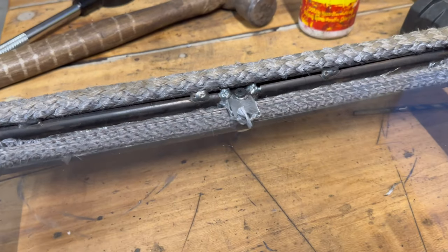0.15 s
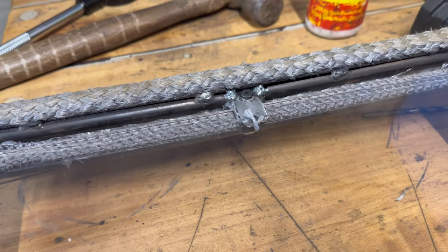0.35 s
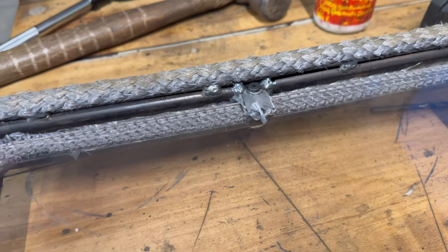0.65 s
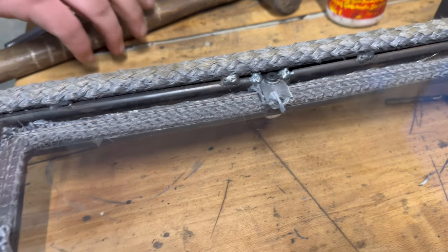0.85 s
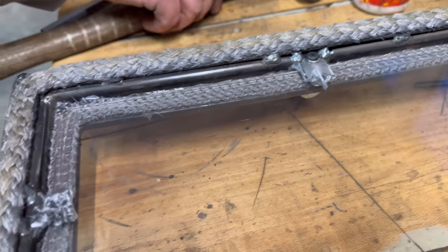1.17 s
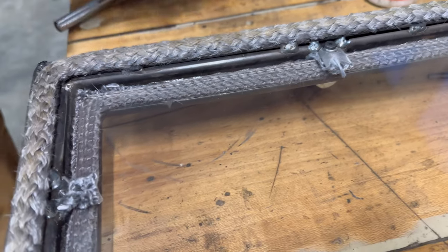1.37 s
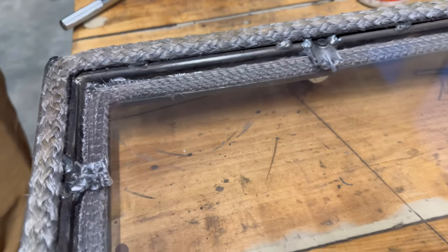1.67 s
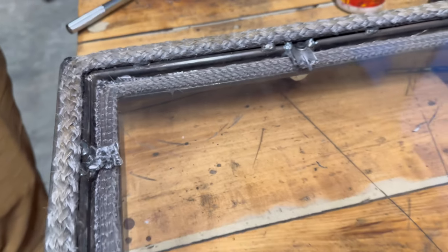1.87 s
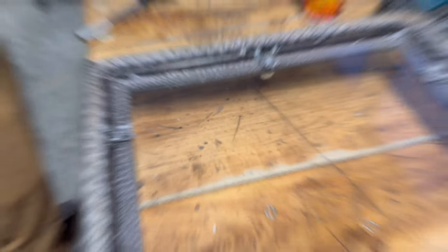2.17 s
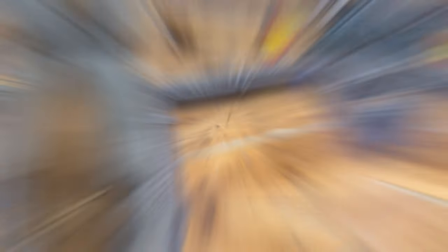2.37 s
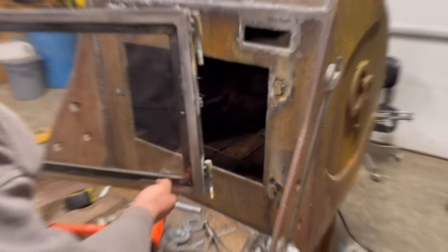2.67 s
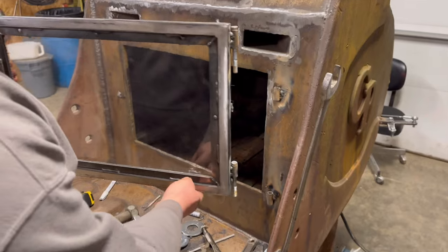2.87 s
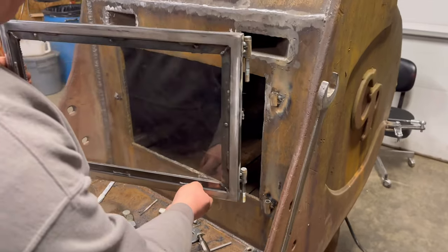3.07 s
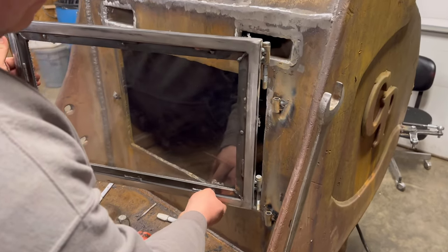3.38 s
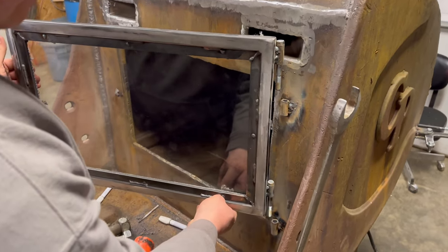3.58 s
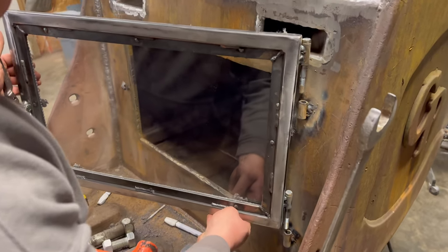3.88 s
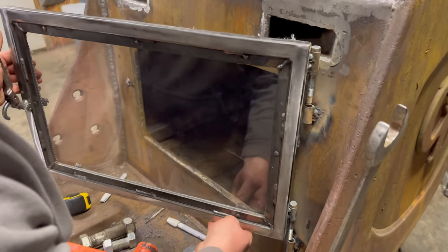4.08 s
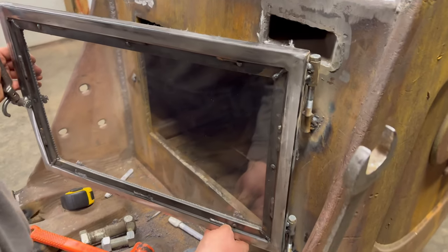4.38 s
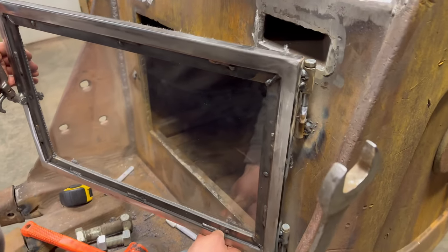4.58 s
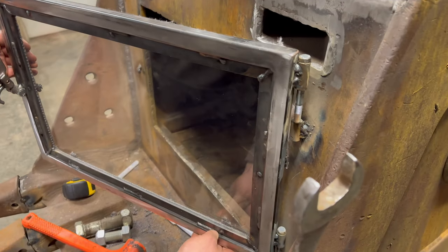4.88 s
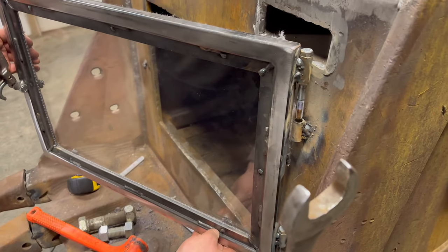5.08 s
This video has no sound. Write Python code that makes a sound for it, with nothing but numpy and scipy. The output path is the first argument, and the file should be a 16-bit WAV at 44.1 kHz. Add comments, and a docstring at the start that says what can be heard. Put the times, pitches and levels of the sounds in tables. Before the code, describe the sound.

Workshop handling noises: faint scuffs and wooden knocks, three booming thuds, one hard tick, then bright steel clanks, scraping and a low hollow drone.

```python
"""Workshop bench and stove door

Four joined scenes in a workshop, on a microphone with two ports; the blows stand well above the room's
reflections. Tools shift on a wooden bench (struck modes), three heavy thumps swell in its low modes, then
come a scuff and a sharp tick. Last, a steel door drops on its hinge pins (thin beating sines) and the stove
body drones (shaken resonances). Hands and sleeves rustle (swelling coloured noise) over a low room rumble."""
import sys
import numpy as np
from scipy import signal
from scipy.fft import next_fast_len
from scipy.io import wavfile
from scipy.ndimage import uniform_filter1d

SR = 44100
rng = np.random.default_rng(int(sys.argv[2]) if len(sys.argv) > 2 else 0)


def unload_audio(sound):
    """Save the sound as a 16-bit wav file, at the path given as the first command line argument."""
    columns = np.transpose(np.atleast_2d(sound))
    # keep every value between -1 and 1, then stretch to whole-number steps
    steps = np.round(np.clip(columns, -1, 1) * 32767)
    wavfile.write(sys.argv[1], SR, steps.astype(np.int16))


def voltage_ratio(level):
    """Linear amplitude factor for a level in decibels (scalar or array-like)."""
    return 10 ** (np.asarray(level, float) / 20)


N = 231022

# Start of each scene and end of the last: t/s
SCENE_CUTS = [0, 1.9635, 2.8635, 4.0885, 5.24]

# Place and microphone
# Room tone: f/Hz, relative level per Hz/dB
ROOM_COLOUR = [(22, -14), (40, 9.5), (62, 18), (100, 17), (140, -3), (260, -2.5), (700, -9), (1300, -12),
               (2000, -51), (3200, -22), (6000, -37.5), (8200, -45.5), (11000, -24.5), (16000, -26.5)]
ROOM_TONE_DB = -66.5
# Decay of the shop's reflections: f/Hz, t60/s
SHOP_DECAY = [(100, 0.36), (500, 0.59), (1500, 0.23), (4000, 0.23), (8000, 0.29), (15000, 0.14)]
SHOP_DB, PIN_TO_SHOP_DB = -10.5, -10  # reflections; the pin's thin notes stir the room less than the blows
# Likeness of left and right in the noises: f/Hz, likeness (0-1)
LEFT_RIGHT_LIKENESS = [(60, 0.81), (150, 0.87), (380, 0.49), (950, 0.043), (2380, 0.07), (5980, 0.01),
                       (15000, 0.97)]
# Microphone notch: f/Hz, width/Hz, depth (0-1)
MIC_NOTCH = (7580, 780, 1)
PORT_LAG = 0.48  # samples that the left port trails for each dB of left-right level
# Swells of a low hum: t/s, level/dB, rise/s, fall/s
HUM_SWELLS = [(3.48, -58, 0.049, 0.11), (3.58, -51.5, 0.11, 0.5), (3.97, -60, 0.027, .035)]
HUM_HZ = 58.64

# Strokes of hands, sleeves, weight and door
STROKE_SLOPE_DB = 20  # a stroke climbs this far in its rise time and sinks this far in its fall time
# Sleeves rustling: t/s, level/dB, rise/s, fall/s
RUSTLE_STROKES = [(.116, -75.5, 0.051, 0.043), (0.183, -77, .01, 0.011), (0.518, -94, .025, .4),
                  (.74, -68, 0.48, 0.16), (.97, -73.5, 0.088, .11), (1.128, -77.5, 0.12, 0.39),
                  (1.4, -68, 0.063, 0.081), (1.65, -79, 0.42, 0.63), (1.82, -75.5, 0.074, .1),
                  (1.964, -73, .002, 1.8), (2.183, -47, 0.034, 0.091), (2.35, -64, 0.35, 0.27),
                  (2.518, -47.5, 0.014, 0.065), (2.69, -50.5, 0.08, 1.6), (2.865, -65.5, .002, 0.21),
                  (3.18, -77, .6, .3), (3.465, -67, 0.044, 2), (3.59, -53.5, 0.036, 0.04),
                  (3.66, -77, .05, 0.16), (3.82, -60.5, 0.014, 0.07), (4.021, -87.5, 0.014, .3),
                  (4.119, -51, 0.027, 0.11), (4.261, -64, 0.052, 0.03), (4.38, -42, 0.044, 0.04),
                  (4.47, -63, .1, 0.12), (4.67, -65, 0.019, 0.044), (4.76, -76, .1, 0.72),
                  (4.96, -72, 0.028, 1.2), (5.045, -50, 0.0036, 0.028)]
# Weight shifting on bench and floor: t/s, level/dB, rise/s, fall/s, rumble relative level/dB
SHIFT_STROKES = [(0.0, -52.5, .01, 0.21, 4), (0.252, -68.5, 0.01, 0.01, -6), (.58, -71.5, 0.18, 0.31, 11.5),
                 (.83, -42.5, 0.11, 0.097, -1.5), (.955, -52, 0.09, 0.16, 9), (1.141, -62, 0.091, 0.1, 6),
                 (1.228, -44.5, 0.05, 0.052, -9), (1.339, -46, 0.082, 0.11, -10),
                 (1.42, -63.5, .05, .1, -5), (1.7, -72, 0.62, 0.9, 11.5), (2.001, -52.5, 0.062, 0.042, 1),
                 (2.1, -62.5, 0.25, 0.43, 1), (2.26, -42.5, 0.052, 0.23, 11), (2.58, -39, .06, 0.073, 6.5),
                 (2.684, -42.5, 0.11, 0.076, -1), (2.749, -49.5, 0.068, 0.22, 8),
                 (3.05, -66.5, 0.67, 0.89, 3), (3.268, -76, .15, .3, 16), (3.45, -66.5, 0.13, 0.034, -7),
                 (3.6, -68, 0.04, 0.9, -20), (3.8, -92, 0.062, 0.19, -35)]
# Hands and tools scuffing: t/s, level/dB, rise/s, fall/s, grit relative level/dB
SCUFF_STROKES = [(0.0, -67, .01, 0.38, -6.5), (.52, -79, 0.049, .3, 10), (.66, -60.5, 0.15, 0.28, -5.5),
                 (0.78, -52, 0.16, 0.31, -12), (1.02, -73, 0.34, 0.083, -18), (1.36, -77, 0.15, .1, -13),
                 (1.41, -65, 0.055, 0.075, 0), (1.65, -72.5, 0.89, 0.74, -4),
                 (1.845, -63, 0.12, 0.028, -8.5), (1.965, -53, 0.0041, 0.58, -13),
                 (2.2, -52.5, 0.096, 0.29, -5.5), (2.35, -59.5, 0.17, 0.35, -5.5),
                 (2.56, -46, 0.079, .2, -6), (2.74, -45.5, 0.07, 1, -1), (2.865, -53, .002, 0.24, -3.5),
                 (3.2, -67, 1, 0.45, -11), (3.533, -41, 0.067, 0.057, -23), (3.595, -40, 0.046, 0.2, -8.5),
                 (3.83, -59.5, 0.15, 0.19, -6.5), (4.124, -45.5, 0.059, 0.15, -7),
                 (4.31, -44.5, 0.036, .03, -12.5), (4.38, -43, 0.043, 0.1, -1.5),
                 (4.488, -49, 0.16, 0.16, -7), (4.69, -51.5, 0.047, 0.17, 5.5),
                 (4.88, -55, 0.28, 0.19, -11), (5.0, -44.5, 0.084, 0.23, -10.5),
                 (5.12, -56, 0.11, .5, -7.5)]
# Door frame dragging on its hinges: t/s, level/dB, rise/s, fall/s, dull body relative level/dB
DRAG_STROKES = [(4.106, -56, 0.014, 0.21, -1.5), (4.25, -66.5, 0.35, 0.15, 5), (4.4, -62, 0.13, 0.81, -9),
                (4.58, -53, 0.65, 0.1, -1.5), (4.69, -61, .03, 0.069, 5.5), (4.88, -56, 0.066, 0.26, 8),
                (4.97, -46.5, 0.04, 0.099, 4.5), (5.055, -41, .015, 0.18, 1.5),
                (5.17, -55.5, 0.088, 0.35, 7)]
# Door shaking the stove body: t/s, upper modes' level/dB, rise/s, fall/s, lowest mode's relative level/dB
STOVE_SHAKES = [(4.12, -62.5, 0.067, 0.13, -12), (4.384, -47, 0.077, 0.045, -26),
                (4.51, -41.5, 0.026, .06, -10.5), (4.594, -39, 0.059, 0.028, -12.5),
                (4.63, -52.5, .02, 0.3, -5), (4.88, -51, 0.035, .3, -4), (4.994, -29, 0.11, 0.035, -15.5),
                (4.93, -45.5, 0.076, 0.08, 3), (5.07, -32, 0.061, 0.038, -17), (5.1, -52, 0.19, .12, 12.5),
                (5.15, -45.5, 0.09, .15, -1)]
# Noise colours of cloth, wood, low rumble, scuffing and its grit: f/Hz, relative level per Hz/dB
CLOTH_COLOUR = [(4000, -5), (6500, 4.5), (9000, -2.5), (11000, 2), (14000, -4.5), (16000, -11.5)]
WOOD_COLOUR = [(112, -10.5), (152, -6.5), (187, -8), (232, -13.5), (322, -12.5), (482, -20), (752, -20),
               (1202, -31.5)]
RUMBLE_COLOUR = [(20, -27), (40, -25), (62, 1), (100, -6), (140, -24.5), (250, -33.5)]
SCUFF_COLOUR = [(400, -24.5), (900, -2), (1600, 4), (2200, 0), (3000, -12), (4500, -41)]
GRIT_COLOUR = [(1800, -5), (2800, 1.5), (4500, -1), (6500, -12.5), (8500, -15)]
FRAME_DB = -3  # how strongly scuffing on the hung door stirs its modes

# Small steel sounds
# Steel rubbing on steel: time of the loudest moment t/s, length/s, f/Hz, level/dB
STEEL_SQUEAKS = [(2.836, 0.029, 4550, -41), (5.007, 0.051, 2700, -40.5), (5.061, 0.092, 1980, -50.5)]
# One hard tick: level/dB, f/Hz, width of each of two resonance passes/Hz, left-right/dB
TICK = (-13.5, 1538, 720, 6)
TICK_S = 3.5852
# Tools struck: t/s, level/dB, lift of modes above 6 kHz/dB, left-right/dB
SPANNER_BLOWS = [(.003, -61.5, -10, 10)]
HAMMER_BLOWS = [(.775, -43, 4, -11), (.812, -51, -16, 1)]
# Modes of the tools: f/Hz, level/dB, t60/s
SPANNER_MODES = [(651, -9, .6), (1136, 0, .6), (1195, -4, .45), (2950, -12, .36), (4199, -8, .55),
                 (8032, -12, .3)]
HAMMER_MODES = [(1141, -15, .6), (1626, -4, .27), (1680, -1, .45), (1715, -4, .4), (1760, -8, .3),
                (2213, -8, .2), (2455, -13, .3), (4151, -7, .12), (4161, -15, .45), (8060, -12, .14)]
# Door landing on its hinge pin: t/s, level/dB, lift of modes above 6 kHz/dB, pitch factor, ring-time factor
PIN_BLOWS = [(4.347, -33, 0, 1.0, 1.0), (4.668, -37.5, 6, 1.018, .75)]
# Modes of the pin before the pitch and ring-time factors: f/Hz, level/dB, t60/s
PIN_MODES = [(4328, 0, .55), (4337, -1.5, .55), (10872, -1, .12), (10895, -9, .27)]
PIN_PAN_DB = 5.5

# Stove, bench and door
# Modes of the stove body: f/Hz, width of each of two resonance passes/Hz, level/dB
STOVE_MODES = [(68.9, 6.7, 5.5), (134.9, 17, -1), (259.4, 14, -14.5)]
EVENING = 0.7  # share of the random swelling that a heavy resonance evens out
# Thumps on the bench: t/s, level/dB
BENCH_THUMPS = [(2.212, -5), (2.517, -3.5), (2.811, -4)]
# Low modes of the thumped bench: f/Hz, level/dB, t60/s
THUMP_MODES = [(74.8, 0, 0.23), (101.1, -3, 0.25), (170.6, -13, 0.25), (191.3, -13, 0.22), (237, -18, 0.16),
               (349, -8, 0.08), (426, -11, 0.08), (575, -12, 0.074)]
THUMP_RISE = 0.014  # s, time constant of the soft landing
# Knocks on the bench, and of steel on steel: t/s, level/dB, treble/dB, ring/dB, left-right/dB
BENCH_BLOWS = [(0.003, -60.5, -2.5, 3.5, -10), (0.094, -60, -22, -16, -5), (0.74, -36.5, -9, -7, -4.5),
               (0.775, -40, -1.5, -0.5, 2), (0.812, -36, -14, -5, -6), (1.028, -55, -34, -14, -5),
               (1.328, -65.5, -7.5, 8, -6.5), (1.345, -62.5, -25, 5.5, -8), (1.388, -68.5, 9.5, -4, 16),
               (1.752, -66, -6, -15, 2), (2.212, -45, -29, 4, -11), (2.229, -36.5, -12, -5.5, -9),
               (2.275, -46.5, -34, -23, 4), (2.343, -48, 0.5, -19, 9.5), (2.512, -33.5, -5, -3.5, 5),
               (2.535, -28, -5.5, -2, 6.5), (2.807, -31, -1.5, -2.5, 8.5), (2.828, -25, -6, -10, 7.5)]
STEEL_BLOWS = [(3.238, -53.5, -23, -37, 4), (3.459, -48.5, -14, -10, 4), (4.089, -41, -28, -12.5, 7.5),
               (4.124, -47, 1, -28, 6), (4.303, -49, -26, -21, 10), (4.331, -32, 1.5, -15, 3.5),
               (4.346, -21, 8, -11, 7), (4.369, -33, 3, -12, 20), (4.665, -24, 5.5, -9.5, 3.5),
               (4.902, -41.5, -30, -11, 5), (4.939, -39.5, -7.5, -3.5, 19), (5.046, -40.5, -18, -3, 18.5),
               (5.196, -47.5, -10, -9, 12)]
# Modes of the bench and of the door's steel: f/Hz, level/dB, t60/s
BENCH_MODES = [(200, -21, 0.12), (320.3, 4, 0.049), (497, 4.5, 0.055), (636, 7, 0.031), (808, 1.5, 0.028),
               (1330, 7.5, 0.019), (2380, -0.5, 0.029)]
STEEL_MODES = [(566, -15.5, 0.12), (751, -4, 0.083), (989, -8.5, 0.13), (1410, -15, 0.43),
               (1844, -4, 0.089), (2100, 0.5, 0.063), (2830, -9.5, 0.057), (3135, -0.5, 0.061),
               (3080, -24, 0.13), (5320, -20, 0.17), (7100, -35, 0.052)]
# Colours of a blow's crack and of its brighter edge: f/Hz, relative level/dB
CRACK_COLOUR = [(150, -14), (500, -7.5), (1000, 4.5), (1700, 9.5), (2500, 0.5), (3600, -8)]
EDGE_COLOUR = [(2800, -6), (4400, 10), (6400, 3.5), (8800, -8), (12100, -26.5), (16000, -47)]
BENCH_RATTLE, STEEL_RATTLE = 0.011, 0.0067  # s, decay time constants of each blow's rattle


def evened(x):
    """Scales to unit rms."""
    return x / np.sqrt(np.mean(x ** 2) + 1e-20)


def read(points, hz):
    """Reads a table on a log-frequency axis."""
    f, value = np.transpose(points)
    return np.interp(np.log(hz + 1), np.log(f + 1), value, left=value[0], right=value[-1])


def add(mix, s, sound):
    """Mixes a sound in at time s, trimmed to the end of the mix."""
    part = mix[..., max(round(s * SR), 0):][..., :sound.shape[-1]]
    part += sound[..., :part.shape[-1]]


def sides(db):
    """Left and right gains for a level difference."""
    return voltage_ratio(np.array([[db / 2], [-db / 2]]))


def placed(x, pan_db):
    """Left and right differ in level and, below about 7 kHz, in time; higher up the two sides arrive together."""
    size = len(x) + 256
    hz = np.fft.rfftfreq(size, 1 / SR)
    lag = LAG_TAPER = PORT_LAG * pan_db / (1 + (hz / 7000) ** 8)  # samples
    turn = np.exp(-1j * np.pi * hz * lag / SR)  # half the lag on each side
    pair = np.fft.irfft(np.fft.rfft(x, size) * np.array([turn, 1 / turn]), size)
    return sides(pan_db) * pair[:, :len(x)]


def resonate(x, hz, width):
    """A fixed one-pole resonance of gain 1, filtered around zero frequency and turned back up."""
    turn = np.exp(2j * np.pi * hz * np.arange(x.shape[-1]) / SR)
    r = np.exp(-np.pi * width / SR)
    return 2 * (turn * signal.lfilter([1 - r], [1, -r], x / turn)).real


def wavering(hz, width):
    """A resonance shaken at random: the pitch wanders, the level holds fairly even."""
    tone = evened(resonate(resonate(rng.standard_normal(N), hz, width), hz, width))
    envelope = abs(signal.hilbert(tone, next_fast_len(N))[:N])
    return evened(tone / (envelope + 0.1) ** EVENING)


def coloured(x, colour):
    """Causal minimum-phase filter: the phase follows from the log gain."""
    hz = abs(np.fft.fftfreq(4096, 1 / SR))
    log_gain = np.log(voltage_ratio(read([(1, -70)] + colour + [(SR / 2, -70)], hz)))
    taps = np.fft.ifft(np.exp(np.conj(signal.hilbert(log_gain)))).real[:2048]
    return signal.fftconvolve(x, taps / np.linalg.norm(taps))[:len(x)]


def noise(colour, size, patchy_db):
    """Two-channel noise of a given colour with drifting loud and soft patches."""
    frames, hz = 4 * N // size + 5, np.fft.rfftfreq(size, 1 / SR)
    a, b, c, d, patches = rng.standard_normal((frames, len(hz), 5)).T
    patches = uniform_filter1d(patches, size=9, axis=0)
    patches = evened(uniform_filter1d(patches, size=7, axis=1))
    same = np.clip(read(LEFT_RIGHT_LIKENESS, hz), -1, 1)[:, None]
    left = a + 1j * b
    right = same * left + np.sqrt(1 - same ** 2) * (c + 1j * d)
    inside = (hz > colour[0][0]) & (hz < colour[-1][0])
    gain = voltage_ratio(read(colour, hz)[:, None] + patchy_db * patches) * inside[:, None]
    z = np.array([left, right]) * gain
    pair = signal.istft(z, nperseg=size, noverlap=size * 3 // 4)[1][:, :N]
    return pair / pair.mean(0).std()  # unit level in the middle of the image


def swells(rows):
    """Level of overlapping strokes, each confined to its scene; a fifth column gives a second layer its share."""
    t, rows = np.arange(0, N + 64, 32) / SR, np.array(rows)
    s, db, rise, fall = rows.T[:4, :, None]
    before, after = (s - t) / np.maximum(rise, 1e-3), (t - s) / np.maximum(fall, 1e-3)
    slope = np.where(t < s, before, after)
    inside = np.searchsorted(SCENE_CUTS, t, "right") == np.searchsorted(SCENE_CUTS, s, "right")
    level = voltage_ratio(db - STROKE_SLOPE_DB * slope) * inside
    layers = [level, level * voltage_ratio(rows[:, -1:])]
    return [np.interp(np.arange(N) / SR, t, np.sqrt((layer ** 2).sum(axis=0))) for layer in layers]


def ringing(modes, top_db=0, factor=1):
    """Half a second of dying sines; top_db lifts the modes above 6 kHz, factor scales the pitch."""
    t = np.arange(SR // 2) / SR
    out = np.zeros(len(t))
    for hz, db, t60 in modes:
        level_db = db + top_db * (hz > 6000)
        out += voltage_ratio(level_db - 60 * t / t60) * np.sin(2 * np.pi * hz * factor * t)
    return out * np.minimum(10 - 20 * t, 1)  # fades out over the last 50 ms


def room_tone():
    """Steady coloured noise of the room, heaviest in the low rumble."""
    return voltage_ratio(ROOM_TONE_DB) * noise(ROOM_COLOUR, size=1024, patchy_db=0.5)


def shop():
    """Sparse reflections of random sign, each band dying at its own speed."""
    taps = np.zeros((2, SR))
    at = np.arange(300, SR - 20, 20) + rng.integers(0, 20, (2, (SR - 301) // 20))
    np.put_along_axis(taps, at, rng.choice([-1., 1.], at.shape), 1)
    hz, t, z = signal.stft(taps, SR, nperseg=256)
    tail = signal.istft(z * voltage_ratio(-60 * t / read(SHOP_DECAY, hz)[:, None]), SR, nperseg=256)[1]
    return tail / np.linalg.norm(tail[0])


def hum():
    """A slightly wavering low tone that swells."""
    return swells(HUM_SWELLS)[0] * wavering(HUM_HZ, 2.9)


def rustling():
    """Sleeve cloth rubs: swelling high noise."""
    return swells(RUSTLE_STROKES)[0] * noise(CLOTH_COLOUR, size=256, patchy_db=3.0)


def frame(level, modes):
    """In the last scene tiny slips, about 400 a second on each side, ring the steel frame."""
    slips = rng.standard_normal((2, N)) * (rng.random(N) < 400 / SR)
    slips *= np.arange(N) > SCENE_CUTS[-2] * SR
    ring = ringing(modes)
    ring = ring[None] / np.linalg.norm(ring)
    return np.sqrt(SR / 400) * signal.fftconvolve(level * slips, ring, axes=1)[:, :N]


def shifting_and_dragging():
    """Shifting weight sounds as wood and rumble; the dragging door has a dull body and rings its frame."""
    wood, rumble = swells(SHIFT_STROKES)
    drag, body = swells(DRAG_STROKES)
    dull = (wood + body) * noise(WOOD_COLOUR, size=1024, patchy_db=3.5)
    low = rumble * noise(RUMBLE_COLOUR, size=4096, patchy_db=0.0)
    return dull + low + frame(drag, STEEL_MODES[:6])


def scuffing():
    """Hands and tools rub: mid noise with a gritty upper part, stirring the hung door's modes."""
    scuff, grit = swells(SCUFF_STROKES)
    rubbed = scuff * noise(SCUFF_COLOUR, size=512, patchy_db=1.5)
    rubbed = rubbed + grit * noise(GRIT_COLOUR, size=256, patchy_db=2.5)
    return rubbed + voltage_ratio(FRAME_DB) * frame(scuff, STEEL_MODES)


def squeaks():
    """Steel rubbing on steel: brief fuzzy whistles of narrow noise."""
    out, t = np.zeros((2, N)), np.arange(SR // 2) / SR - 1 / 4
    for s, length, hz, db in STEEL_SQUEAKS:
        whistle = evened(resonate(resonate(rng.standard_normal(len(t)), hz, 320), hz, 320))
        whistle = whistle * np.exp(-(2 * t / length) ** 2)
        add(out, s + t[0], voltage_ratio(db) * placed(whistle, pan_db=12.0))
    return out


def snap():
    """A single sharp blow through one broad resonance, with a trace of bright edge."""
    db, hz, width, pan_db = TICK
    out = np.zeros((2, N))
    blow = 1. * (np.arange(SR // 10) == 8)
    tick = resonate(resonate(blow, hz, width), hz, width) + 0.016 * coloured(blow, EDGE_COLOUR)
    add(out, TICK_S, voltage_ratio(db) * placed(tick / abs(tick).max(), pan_db))
    return out


def clinks(hits, modes):
    """Solid steel tools sing thin notes; close pairs of modes beat."""
    out = np.zeros((2, N))
    for s, db, top_db, pan_db in hits:
        add(out, s, voltage_ratio(db) * placed(ringing(modes, top_db), pan_db))
    return out


def thumps():
    """The weight lands softly, so the bench's low modes swell, beat and die."""
    out = np.zeros((2, N))
    swell = (1 - np.exp(-np.arange(SR // 2) / SR / THUMP_RISE)) ** 3
    for s, db in BENCH_THUMPS:
        add(out, s, voltage_ratio(db) * sides(-2.6) * swell * ringing(THUMP_MODES))
    return out


def knocks(rows, modes, rattle_s):
    """A short rattling crack and a brighter edge; a like rattle stirs the modes of the struck thing."""
    out, t = np.zeros((2, N)), np.arange(SR // 2) / SR
    rattle = np.exp(-t / max(rattle_s, 1e-4)) * np.minimum(t / 0.0021, 1)
    for s, db, treble_db, ring_db, pan_db in rows:
        burst = rng.standard_normal((3, len(t))) * rattle
        edge = coloured(burst[1] * np.exp(-t / 0.018), EDGE_COLOUR)
        crack = coloured(burst[0], CRACK_COLOUR) + voltage_ratio(treble_db) * edge
        push = burst[2] / np.linalg.norm(burst[2])
        ring = signal.fftconvolve(push, ringing(modes))[:len(t)]
        add(out, s, voltage_ratio(db) * placed(crack + voltage_ratio(ring_db) * ring, pan_db))
    return out


def pin():
    """The hinge pin sings higher and shorter as it seats deeper."""
    out = np.zeros((2, N))
    for s, db, top_db, factor, shorter in PIN_BLOWS:
        modes = [(hz, level_db, t60 * shorter) for hz, level_db, t60 in PIN_MODES]
        add(out, s, voltage_ratio(db) * placed(ringing(modes, top_db, factor), PIN_PAN_DB))
    return out


def drone():
    """Random shaking drives the hollow steel stove body."""
    upper, low = swells(STOVE_SHAKES)
    levels = (low, upper, upper)
    return sum(level * voltage_ratio(db) * wavering(hz, w) for (hz, w, db), level in zip(STOVE_MODES, levels))


def scene():
    """Each scene's blows ring in the shop and are cut off at the next join."""
    out = room_tone() + hum() + rustling() + shifting_and_dragging() + scuffing() + drone()
    hits = squeaks() + snap() + clinks(SPANNER_BLOWS, SPANNER_MODES) + clinks(HAMMER_BLOWS, HAMMER_MODES)
    hits = hits + knocks(BENCH_BLOWS, BENCH_MODES, BENCH_RATTLE)
    hits = hits + knocks(STEEL_BLOWS, STEEL_MODES, STEEL_RATTLE)
    notes, low = pin(), thumps()
    sent = (hits + voltage_ratio(PIN_TO_SHOP_DB) * notes).mean(0)
    struck = hits + notes
    for a, b in zip(SCENE_CUTS, SCENE_CUTS[1:]):
        part = slice(round(a * SR), round(b * SR))
        wet = signal.fftconvolve(sent[None, part], shop(), axes=1)
        # scenes that start after the first thump carry no thump tail
        direct = struck[:, part] + low[:, part] * (a < BENCH_THUMPS[0][0])
        add(out, a, direct + voltage_ratio(SHOP_DB) * wet[:, :direct.shape[1]])
    return out


def roll_off(x):
    """The treble ends steeply here."""
    return signal.sosfilt(signal.butter(12, 16480, fs=SR, output="sos"), x)


def record(dry):
    """The microphone has a narrow dip in its treble: a resonance is taken away."""
    hz, width, depth = MIC_NOTCH
    mix = dry - depth * resonate(dry, hz, width)
    return roll_off(mix)


dry = scene()
out = record(dry)
unload_audio(out)
```